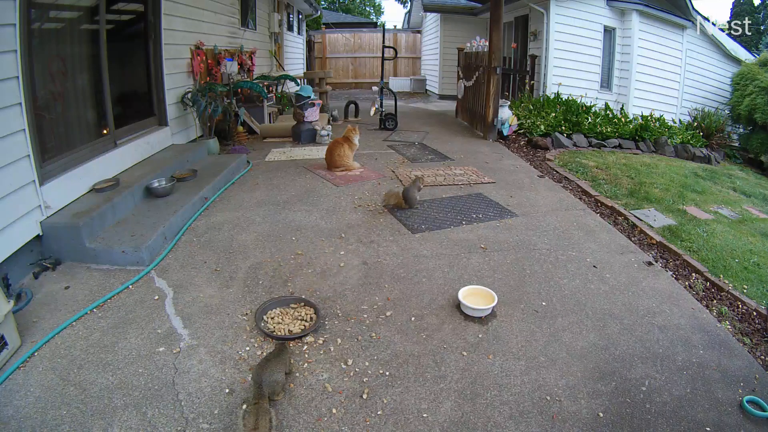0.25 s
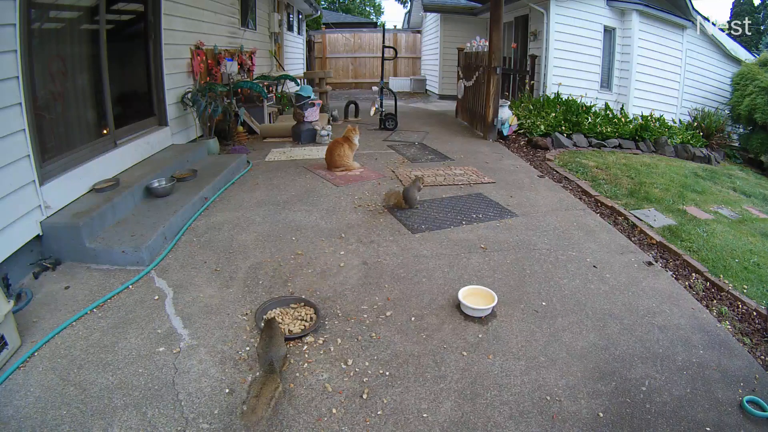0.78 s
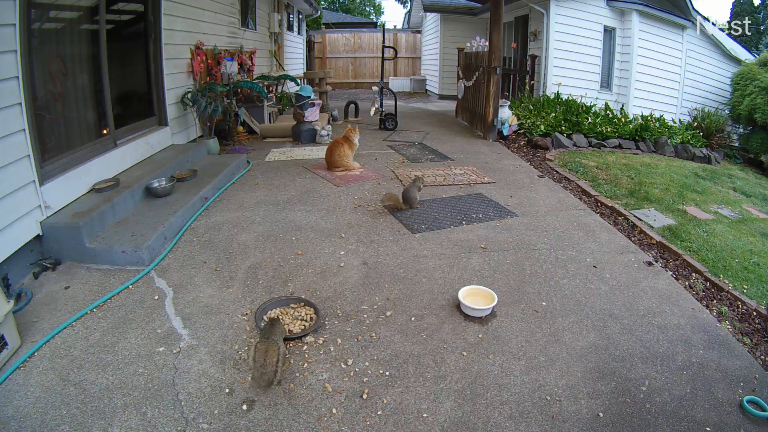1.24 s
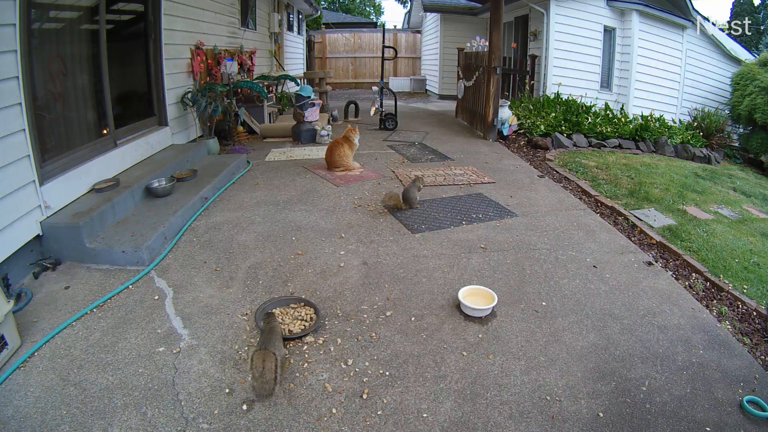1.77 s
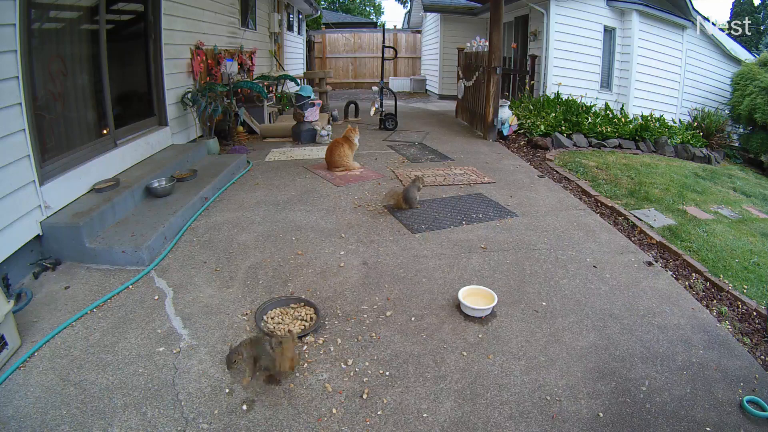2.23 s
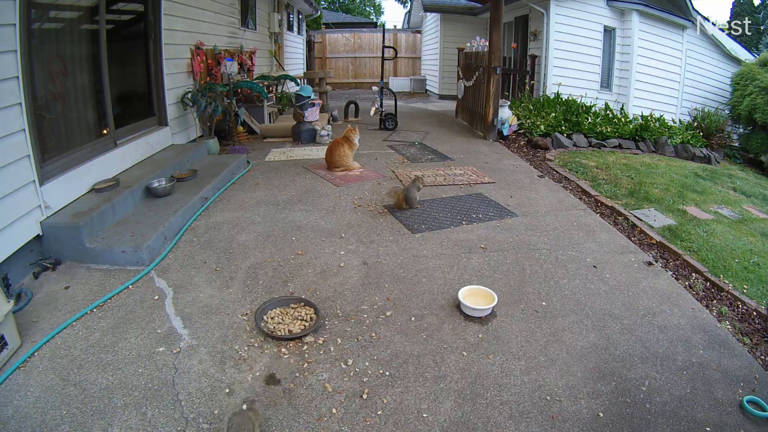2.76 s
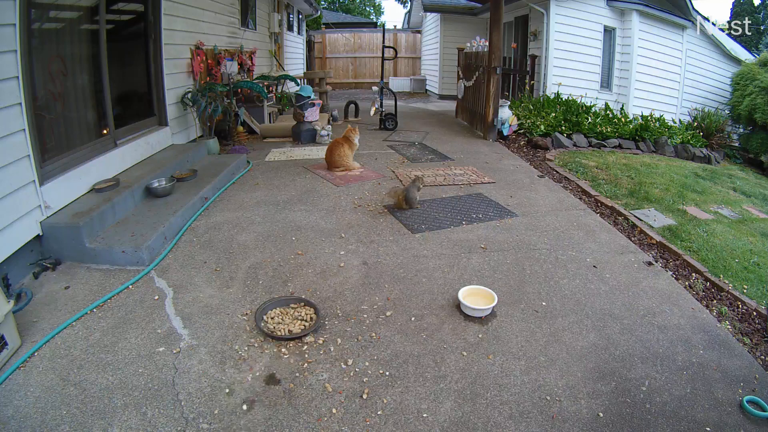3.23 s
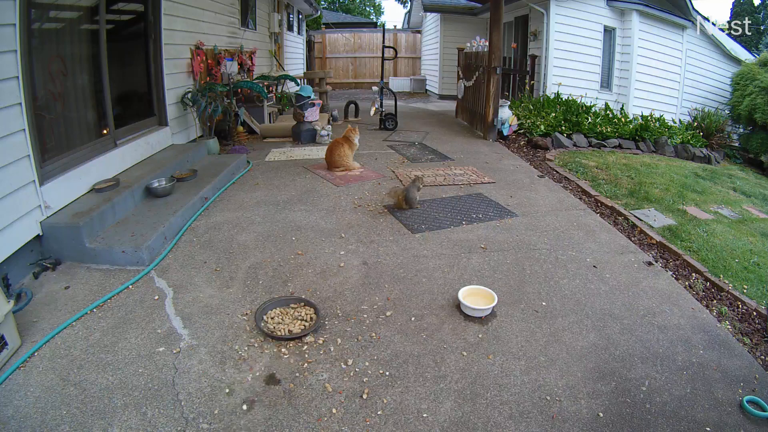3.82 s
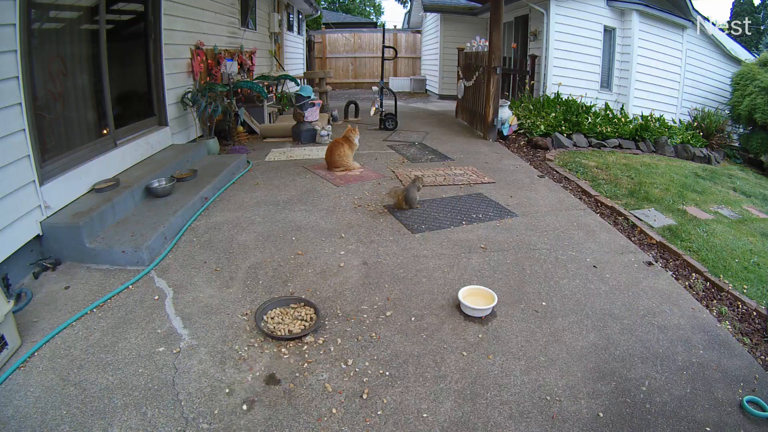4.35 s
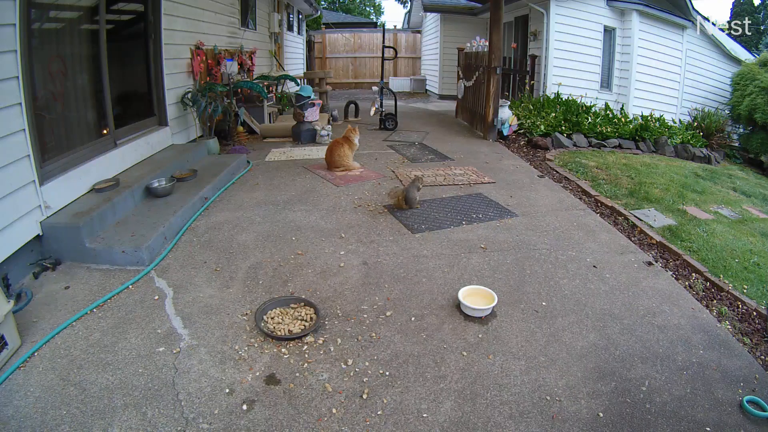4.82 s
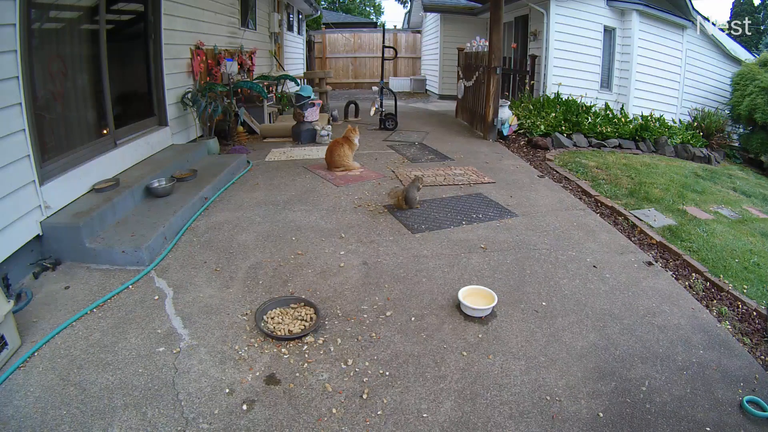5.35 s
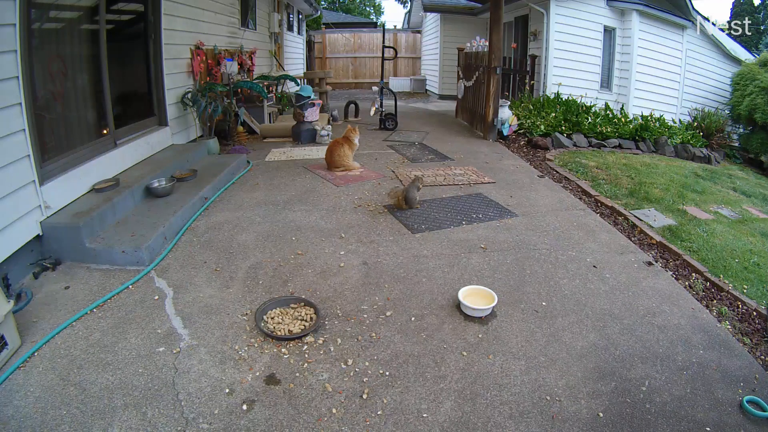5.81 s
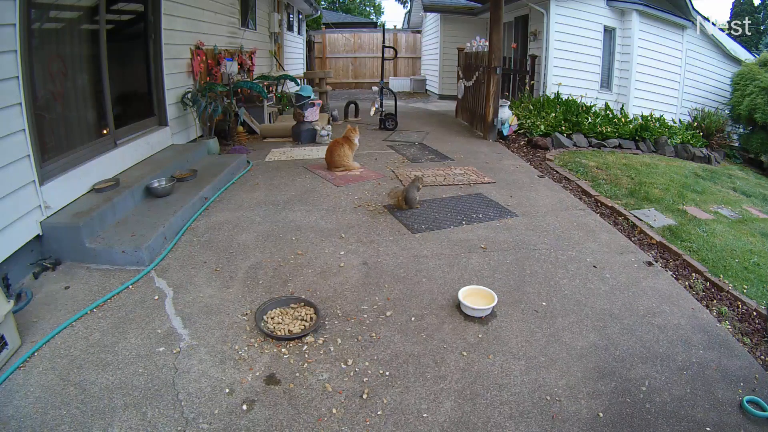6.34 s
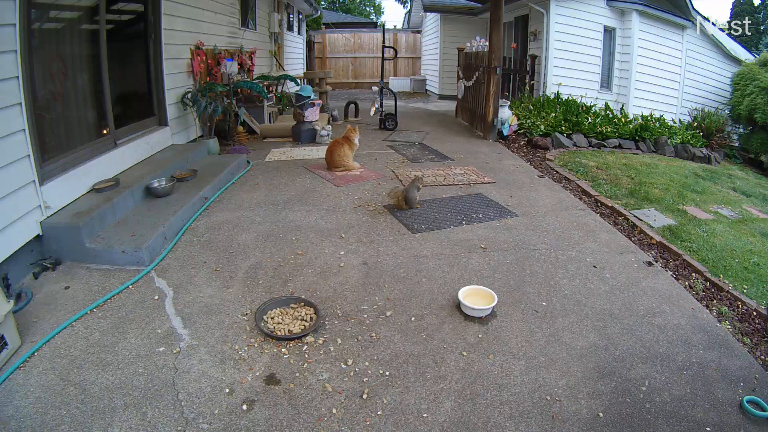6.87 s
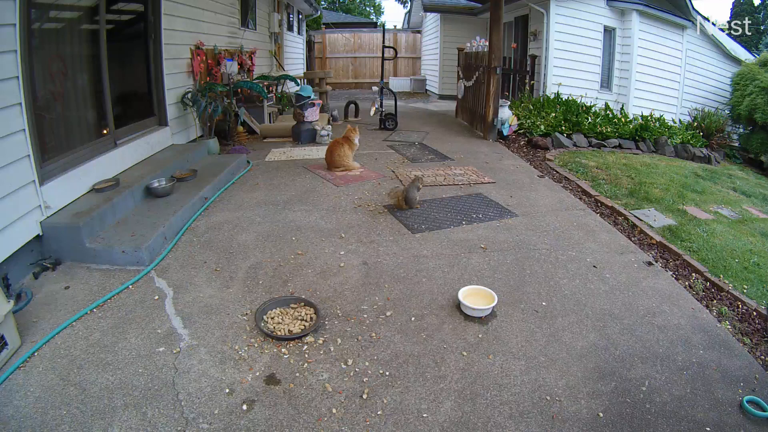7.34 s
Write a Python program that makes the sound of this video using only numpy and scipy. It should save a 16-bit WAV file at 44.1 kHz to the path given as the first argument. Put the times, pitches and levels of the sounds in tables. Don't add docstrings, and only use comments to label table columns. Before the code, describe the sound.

A squirrel cracks and nibbles peanut shells on a concrete patio, brittle snaps bunching into two loud crunches over a faint, watery hiss.

```python
import sys
import numpy as np
from scipy import signal
from scipy.fft import rfft, irfft
from scipy.io import wavfile
from scipy.ndimage import uniform_filter1d

SR = 44100
rng = np.random.default_rng(int(sys.argv[2]) if len(sys.argv) > 2 else 0)


def magnitude_from_level(level_db):
    exponent = np.asarray(level_db, float) / 20
    return 10 ** exponent


def digitize_waveform(pressure):
    field = np.atleast_2d(pressure).T
    bounded = np.clip(field, -1, 1)
    quanta = np.round(bounded * 32767).astype(np.int16)
    wavfile.write(sys.argv[1], SR, quanta)


N = 334710
HISS_DB = -59.5


def evened(x):
    return x / np.sqrt(np.mean(x ** 2) + 1e-20)


def read(points, hz):
    f, value = np.transpose(points)
    return np.interp(np.log(hz + 1), np.log(f + 1), value)


def curve(rows):
    return np.interp(np.arange(N) / SR, *np.transpose(rows))


def mode(hz, centre_hz, width_hz):
    return 1j * hz * width_hz / (centre_hz ** 2 - hz ** 2 + 1j * hz * width_hz)


# (frequency [Hz], density [dB per Hz])
HISS_SPECTRUM = [(35, -35), (60, -3), (115, -21.5), (291, -6), (357, -5.5), (411, -10), (455, -0.5),
                 (503, -3), (1160, -2), (1570, -5), (2040, -7.5), (2600, -10), (5390, -10.5), (6600, -12.5),
                 (7600, -37.5), (9880, -83), (16700, -120)]
# (time [s], low wash level [dB])
BREEZE_LEVEL = [(0.0, -60.5), (1.51, -60), (3.28, -59.5), (3.561, -63), (4.45, -60), (6.15, -60),
                (6.6, -59.5), (7.0, -60), (7.59, -60)]


def hiss():
    hop, size = 256, 1024
    frames, hz = N // hop + 5, np.fft.rfftfreq(size, 1 / SR)
    real, imaginary, patches = rng.standard_normal((frames, 513, 3)).T
    patches = evened(uniform_filter1d(uniform_filter1d(patches, 14, 0), 14, 1))
    gain = magnitude_from_level(read(HISS_SPECTRUM, hz))
    band = (hz > 2500) & (hz < 7000)
    gain *= magnitude_from_level(HISS_DB) / np.sqrt(np.sum(gain[band] ** 2))
    times, levels = np.transpose(BREEZE_LEVEL)
    gust_db = np.interp(np.arange(frames) * hop / SR, times, levels) - np.median(levels)
    reach = 1 / (1 + (hz / 2200) ** 4)
    moving_db = 1.5 * patches + reach[:, None] * gust_db
    z = (real + 1j * imaginary) * gain[:, None] * magnitude_from_level(moving_db)
    return 0.61 * signal.istft(z, nperseg=size, noverlap=size - hop)[1][:N]


# (frequency [Hz], rms level [dB])
FAN_LINES = [(362, -81), (470, -83), (690, -82.5), (1410, -76.5)]


def fan():
    drift = evened(uniform_filter1d(rng.standard_normal((len(FAN_LINES), N)), 2500))
    out = np.zeros(N)
    for (hz, db), wander in zip(FAN_LINES, drift):
        turns = np.cumsum(hz + 7.0 * wander) / SR
        out += magnitude_from_level(db + 4.5 + 5.0 * wander[::-1]) * np.sin(2 * np.pi * turns)
    return out


# (start [s], length [s], level [dB])
GUST = (6.7, 0.29, -57)


def puff():
    start, length, db = GUST
    n, out = round(length * SR), np.zeros(N)
    band = signal.butter(2, [170, 1300], "bandpass", fs=SR, output="sos")
    air = signal.sosfilt(band, rng.standard_normal(n))
    u = np.linspace(0, 6, n)
    out[round(start * SR):][:n] = magnitude_from_level(db) * evened(air) * u * np.exp(1 - u)
    return out


# (delay [s], level [dB])
REFLECTIONS = [(.0013, -9), (.0085, -10.5), (0.0139, -15), (.021, -20)]


def patio():
    n, t60_s = SR // 4, 0.14
    taps = np.zeros(n)
    at = np.arange(200, n - 20, 20)
    taps[at + rng.integers(0, 20, len(at))] = rng.choice([-1., 1.], len(at))
    taps *= magnitude_from_level(-60 * np.arange(n) / SR / t60_s)
    taps *= magnitude_from_level(-15) / np.linalg.norm(taps)
    taps[0] = 1
    for s, db in REFLECTIONS:
        taps[round(s * SR)] += magnitude_from_level(db)
    return taps


# (frequency [Hz], width [Hz], level [dB])
SHELL_MODES = [(1640, 890, -26.5), (2295, 420, -4.5), (3400, 490, 0), (4659, 490, 0.5), (5358, 660, -2),
               (6443, 950, 0), (7274, 1200, -5)]


def shell(hz):
    return sum((-1) ** k * magnitude_from_level(db) * mode(hz, f, w) for k, (f, w, db) in enumerate(SHELL_MODES))


# (time [s], scrape level [dB])
GNAW_LEVEL = [(0.0, -57.5), (0.14, -66.5), (1.106, -61), (1.45, -66), (1.598, -56.5), (1.78, -62.5),
              (3.0, -61), (3.3, -62), (3.754, -63.5), (3.86, -51.5), (3.942, -46.5), (4.052, -48),
              (4.244, -59), (4.42, -62.5), (4.65, -61.5), (5.8, -61.5), (6.4, -62.5), (7.59, -63)]
# (start [s], length [s], level [dB], ring [Hz], fade [dB])
CRUSH_BURSTS = [(0.111, 0.06, -63, 5670, -14), (1.551, 0.073, -58, 5700, 6), (1.953, 0.033, -46, 3730, 0.5),
                (1.982, 0.046, -50, 5460, -7), (2.127, 0.025, -53, 4600, -3),
                (3.378, 0.045, -43, 4400, -18), (3.426, 0.018, -51, 5570, 1), (3.525, 0.018, -53, 5700, 6),
                (3.689, 0.071, -58, 5510, -2), (3.731, 0.13, -58, 5030, 11),
                (3.916, 0.057, -44, 3400, -4.5), (3.917, 0.05, -44, 4990, 7.5),
                (2.142, 0.025, -51.5, 5260, 10), (4.043, 0.036, -41.5, 5306, -2.5),
                (4.107, 0.053, -48, 5420, -10.5), (4.248, 0.071, -58.5, 3274, 0.5),
                (4.285, 0.12, -55, 5730, -2.5), (4.6, .055, -56, 4590, -14.5), (4.79, 0.04, -50, 4220, 8),
                (4.885, 0.05, -58.5, 5500, 10), (6.943, 0.14, -62, 5860, -12),
                (7.058, 0.11, -59.5, 5320, 4.5), (7.158, 0.064, -65, 5220, 4)]


def gnawing():
    sizes = magnitude_from_level(2.6 * np.minimum(rng.exponential(1, N), 5))
    grit = sizes * (rng.random(N) < 4000 / SR) * rng.choice([-1, 1], N)
    hz = np.fft.rfftfreq(1024, 1 / SR)
    grit = evened(signal.oaconvolve(grit, irfft(shell(hz)))[:N])
    out = grit * np.sqrt(np.maximum(magnitude_from_level(curve(GNAW_LEVEL)) ** 2 - magnitude_from_level(HISS_DB - 3.0) ** 2, 0))
    other_grit = np.roll(grit, SR)
    for start, length, db, ring_hz, fade_db in CRUSH_BURSTS:
        at, n = round(start * SR), round(length * SR)
        ring = irfft(1 + magnitude_from_level(13.0) * mode(hz, ring_hz, 350))
        burst = evened(signal.oaconvolve(other_grit[at:at + n], ring)[:n])
        fade = magnitude_from_level(db - fade_db * np.linspace(-.5, .5, n))
        out[at:at + n] += fade * signal.windows.tukey(n, .4) * burst
    return out


def snaps(rows):
    lead, size = 400, 4096
    s, db, ring_hz, thud_db, t60 = (c[:, None] for c in np.transpose(rows))
    t, hz = np.arange(size) / SR - lead / SR, np.fft.rfftfreq(size, 1 / SR)
    crumble = rng.standard_normal((len(s), size)) * magnitude_from_level(5.0 * rng.standard_normal((len(s), size)))
    swell = magnitude_from_level(2601.5 * np.minimum(t, 0))
    decay = magnitude_from_level(-60 * t / np.clip(t60, .004, .15))
    blow = 0.074 * crumble * np.where(np.arange(size) < lead, swell, decay)
    blow[:, lead] += np.clip(1.53 + .05 * (db[:, 0] + 23), .2, 2)
    ring = magnitude_from_level(5.5 + np.clip(-32.5 - db, 0, 7)) * mode(hz, ring_hz, 280)
    body = mode(hz, 1800, 2000) ** 2 + magnitude_from_level(-9) * mode(hz, 900, 800) ** 2
    colour = shell(hz) + ring + magnitude_from_level(thud_db + 3.0) * body
    sound = irfft(rfft(blow) * colour)
    sound *= magnitude_from_level(db) / abs(sound).max(1, keepdims=True)
    out = np.zeros(N + size)
    np.add.at(out, np.round(s * SR).astype(int) - lead + np.arange(size), sound)
    return out[:N]


# (time [s], peak [dB], strongest ring [Hz])
CLAW_KNOCKS = [(3.7117, -38.5, 2296), (4.564, -53.5, 2190), (5.2663, -45.5, 2400), (5.3641, -51.5, 2170),
               (5.3896, -42, 3080), (6.072, -52, 2300), (7.278, -36.5, 1950), (7.3648, -51, 2210),
               (7.3762, -47, 2110)]


def knocks():
    return snaps([(*row, 8.5, .018) for row in CLAW_KNOCKS])


# (time [s], peak [dB], strongest ring [Hz])
SPLINTER_TICKS = [(1.5644, -41.5, 3890), (1.5695, -39, 6500), (1.578, -39, 5130), (1.589, -43.5, 5000),
                  (1.962, -36, 3380), (1.967, -35, 5300), (1.979, -35, 3930), (2.009, -44.5, 5360),
                  (3.4131, -29.5, 3260), (3.538, -42.5, 3400), (3.7032, -36, 5800), (3.7623, -36, 4920),
                  (3.85, -41, 4700), (3.8875, -18, 2285), (3.897, -30.5, 1862), (3.9222, -31, 4880),
                  (3.9384, -25.5, 5180), (3.9466, -33, 3520), (3.9584, -35, 3940), (3.973, -32.5, 3970),
                  (4.0333, -27, 3670), (4.037, -34.5, 5810), (4.0793, -25, 4760), (4.093, -38, 5420),
                  (4.1245, -35, 5430), (4.144, -32.5, 5590), (4.16, -35.5, 5490), (4.22, -38.5, 3980),
                  (4.248, -42, 2240), (4.298, -38.5, 3400), (4.33, -47, 5400), (4.36, -43, 3400),
                  (4.393, -43.5, 5120)]


def splinters():
    return snaps([(*row, -18.5, .016) for row in SPLINTER_TICKS])


# (time [s], peak [dB], strongest ring [Hz], thud [dB re peak])
SHARP_FLAKES = [(1.5702, -40.5, 2240, -1), (1.578, -40.5, 2170, -2), (3.3845, -35.5, 5600, -20),
                (3.363, -36, 5720, -28), (3.4125, -28, 3260, -18), (3.4104, -24, 5180, -10.5),
                (3.7187, -31.5, 5940, -15), (3.7465, -34.5, 2260, -9.5), (3.7497, -29, 5110, -20),
                (3.7715, -42, 4940, -20.5), (3.8845, -24, 5360, -13), (3.8875, -24, 6170, -14.5),
                (3.8958, -25, 5540, -4), (4.0235, -30, 3310, -20), (4.0278, -24.5, 5770, -12),
                (4.064, -25.5, 5470, -21.5), (4.1498, -25, 4370, -22.5), (5.385, -43, 2320, -27),
                (5.9052, -41.5, 7500, -12), (5.9088, -34.5, 3380, -15)]


def flakes():
    return snaps([(*row, .0094) for row in SHARP_FLAKES])


# (time [s], peak [dB], strongest ring [Hz])
LIGHT_BITES = [(0.111, -51, 5500), (0.125, -46.5, 5570), (0.888, -47.5, 4820), (1.1456, -46, 4310),
               (1.5691, -41, 2210), (1.7462, -41.5, 3370), (1.826, -41, 3860), (2.1266, -51.5, 5270),
               (2.5616, -47, 3510), (2.9011, -47.5, 3680), (2.9149, -45, 4020), (3.1067, -44.5, 3690),
               (3.5275, -45, 2910), (3.537, -41.5, 4610), (4.268, -45, 3320), (4.6097, -44.5, 5800),
               (4.6384, -44, 4510), (4.6709, -45.5, 5210), (4.8968, -47, 5270), (4.9106, -45, 5580),
               (5.5602, -45, 3570), (5.6457, -48.5, 5435), (5.7852, -49, 3650), (5.869, -51, 3250),
               (6.2024, -54.5, 3520), (6.2175, -45.5, 3400), (6.486, -45.5, 3600), (7.067, -50.5, 5120),
               (7.2778, -42.5, 3135), (7.378, -42.5, 3120)]


def nibbles():
    return snaps([(*row, -13, .038) for row in LIGHT_BITES])


# (time [s], peak [dB], strongest ring [Hz], thud [dB re peak])
SECOND_BREAKS = [(1.072, -40, 4260, -20), (1.993, -35, 5330, -14), (3.397, -29, 2240, -3.5),
                 (3.4114, -19.5, 4710, -10), (3.4179, -30, 3160, -6.5), (3.564, -35, 5690, -19),
                 (3.759, -46, 4960, -22), (3.883, -34, 3300, -15), (3.8954, -20, 3370, -13.5),
                 (3.9005, -29.5, 4870, -22), (3.9504, -28, 3505, -20), (3.9654, -28.5, 4170, -14),
                 (4.0305, -29, 3430, -19.5), (4.1545, -30.5, 5550, -16.5), (5.9167, -45, 3350, -23),
                 (6.2171, -43.5, 5340, -22)]


def splits():
    return snaps([(*row, .012) for row in SECOND_BREAKS])


# (time [s], peak [dB], strongest ring [Hz], thud [dB re peak])
SHELL_CRACKS = [(1.0652, -40, 5780, -41), (1.5726, -36.5, 4750, -8.5), (1.8905, -44.5, 3400, -12.5),
                (1.9418, -33.5, 5110, -24.5), (1.9568, -30, 4390, -14), (2.13, -46, 2910, 4.5),
                (2.135, -41.5, 4660, -13), (3.2869, -43, 3450, -5), (3.3628, -33, 5680, -17.5),
                (3.3816, -44, 2220, -28), (3.4044, -19, 5110, -19), (3.4098, -20, 4860, -35.5),
                (3.5637, -40, 5500, -15), (3.704, -39, 2300, -20), (3.7124, -31.5, 5820, -9),
                (3.7182, -31.5, 5940, -11), (3.7487, -19.5, 4810, -39), (3.887, -27.5, 3500, -10),
                (3.928, -25.5, 5530, -9.5), (3.933, -26, 3560, -28), (4.0077, -25.5, 5450, -23),
                (4.0276, -17, 3460, -28), (4.0637, -26, 5200, -38.5), (4.074, -20.5, 5770, -30),
                (4.1495, -23.5, 5700, -23.5), (4.2879, -32, 3440, -13.5), (4.7994, -35, 4620, -7),
                (5.3943, -33, 3104, -1.5), (5.7065, -34.5, 3400, -14.5), (5.9065, -27.5, 3400, -15)]


def cracks():
    return snaps([(*row, .032) for row in SHELL_CRACKS])


def scene():
    snapping = cracks() + nibbles() + knocks() + splits() + splinters() + flakes()
    steady = gnawing() + hiss() + fan() + puff()
    return (signal.oaconvolve(snapping, patio())[:N] + steady)[None]


# (frequency [Hz], width [Hz], level [dB])
HOUSING_MODES = [(1116, 150, 4.5), (2040, 160, 7), (3370, 180, 1.5), (5254, 350, 6), (2808, 250, -1.5),
                 (4300, 110, -1.5), (4987, 180, -3.5), (5845, 170, -0.5)]


def housing(x):
    hz = np.linspace(0, SR / 2, 1025)
    db = sum(level / (1 + ((hz - f) / w * 2) ** 2) for f, w, level in HOUSING_MODES)
    response = signal.firwin2(1025, hz, magnitude_from_level(db) / (1 + (hz / 8300) ** 40), fs=SR)
    return signal.oaconvolve(x, response, "same")


LOW_SR = 16000


def treble_times(x, gain):
    bass = signal.oaconvolve(x, signal.firwin(201, 1100, fs=LOW_SR), "same")
    treble = gain * (x - bass)
    deep = signal.oaconvolve(treble, signal.firwin(201, 500, fs=LOW_SR), "same")
    return bass + treble - deep


# (frequency [Hz], level [dB])
ROUNDING_STEP = [(60, -2), (300, -7), (1500, -4), (2400, 5), (3200, 9.5), (6700, 9), (7200, 4)]
# (frequency [Hz], level [dB])
HEARING_FLOOR = [(30, -58), (120, -68), (190, -71), (260, -88.5), (6900, -90), (7250, -68.5), (7750, -66)]


def coarse(x, size, start, bands, step_db, spread_db, scatter_db, ahead_db, starve, top_cut):
    n, k = np.arange(2 * size), np.arange(size)
    rise = np.kaiser(size + 1, 4 * np.pi)
    rise = np.sqrt(np.cumsum(rise)[:size] / rise.sum())
    window = np.r_[rise, rise[::-1]][:, None] * np.sqrt(2 / size)
    basis = np.cos(np.pi / size * np.outer(n + .5 + size / 2, k + .5)) * window
    lead = size - start % size
    halves = np.pad(x, (lead, 2 * size - (len(x) + lead) % size)).reshape(-1, size)
    c = np.hstack([halves[:-1], halves[1:]]) @ basis
    width = np.diff(list(bands) + [size])
    hz = (np.array(bands) + width / 2) * LOW_SR / 2 / size
    power = np.add.reduceat(c ** 2, bands, 1) / width + 1e-16
    near = np.abs(np.subtract.outer(np.arange(len(bands)), np.arange(len(bands))))
    mask = np.sqrt((power[:, None] * magnitude_from_level(-2 * spread_db * near)).max(2))
    for db, blocks_on in ((ahead_db, (1, 2)), (ahead_db + 9, (4, 5))):
        later = np.maximum(*[np.roll(mask, -b, 0) for b in blocks_on])
        mask = np.maximum(mask, magnitude_from_level(-db) * later)
    busy_db = np.maximum(10 * np.log10(power[:, hz > 2500].max(1, keepdims=True)) + 57, 0)
    starved_db = busy_db * np.where(hz < 1700, starve, np.where(hz < 2600, .5 * starve, -.1))
    scatter = scatter_db * rng.standard_normal(mask.shape)
    step = mask * magnitude_from_level(read(ROUNDING_STEP, hz) + step_db + starved_db + scatter)
    floor_db = read(HEARING_FLOOR, hz) + .7 * busy_db * (hz < 260) + top_cut * busy_db * (hz > 6900)
    heard = power > magnitude_from_level(2 * (floor_db + 4.0 * rng.standard_normal((len(c), 1))))
    step = np.repeat(step, width, 1)
    whole = np.floor((abs(c) / step) ** .75 + .4054)
    rounded = np.sign(c) * whole ** (4 / 3) * step * np.repeat(heard, width, 1)
    blocks = rounded @ basis.T
    out = np.vstack([blocks[:1, :size], blocks[1:, :size] + blocks[:-1, size:]])
    return out.ravel()[lead:lead + len(x)]


LONG_EDGES = [0, 8, 16, 24, 32, 40, 48, 56, 64, 72, 80, 88, 100, 112, 124, 136, 148, 160, 172, 184, 196,
              212, 228, 244, 260, 280, 300, 320, 344, 368, 396, 424, 456, 492, 532, 572, 616, 664, 716, 772,
              832, 896, 960]
SHORT_EDGES = [0, 4, 8, 12, 16, 20, 24, 28, 32, 40, 48, 60, 72, 88, 100, 114]
SPLIT_FRAMES = [23, 29, 51, 56, 59, 83, 87, 88, 91]


def camera(x):
    frame, grid = 1024, 714
    x = signal.resample_poly(x, 160, 441, window=("kaiser", 8))
    in_short = np.isin((np.arange(len(x)) - grid - frame // 2) // frame, SPLIT_FRAMES)
    share = uniform_filter1d(1. * in_short, 128)
    short = coarse(share * x, size=frame // 8, start=grid + frame // 16, bands=SHORT_EDGES, step_db=0.2,
                   spread_db=6, scatter_db=2.5, ahead_db=13, starve=.15, top_cut=.8)
    loud = np.maximum(np.sqrt(abs(uniform_filter1d(x ** 2, 48))) / magnitude_from_level(-53.5), 1) ** .9
    loud /= uniform_filter1d(loud, frame)
    long = coarse(treble_times((1 - share) * x, 1 / loud), size=frame, start=grid, bands=LONG_EDGES,
                  step_db=1.2, spread_db=4.5, scatter_db=1.6, ahead_db=60, starve=.55, top_cut=.1)
    long = treble_times(long, loud) * np.minimum(8 * (1 - share), 1)
    leaky = signal.firwin(441 * 28 + 1, 1 / 441, window=("kaiser", 7))
    return signal.resample_poly(short + long, 441, 160, window=leaky)[None, :N]


def band_limit(x):
    return signal.sosfilt(signal.butter(12, 8860, fs=SR, output="sos"), x)


def record(dry):
    mix = camera(housing(dry[0]))
    return band_limit(mix)


dry = scene()
out = record(dry)
digitize_waveform(out)
```